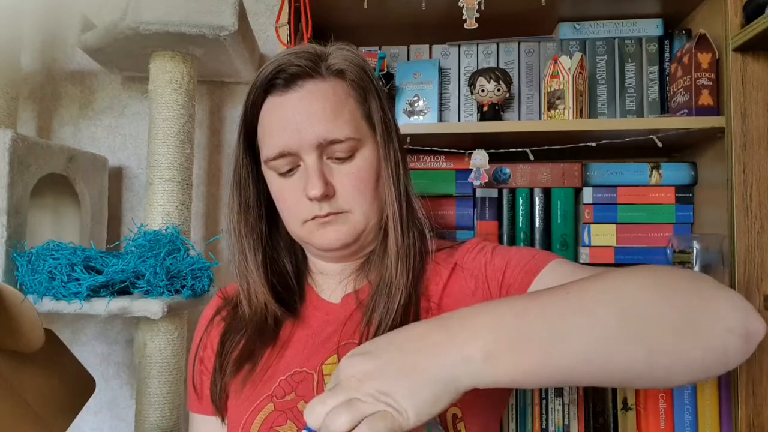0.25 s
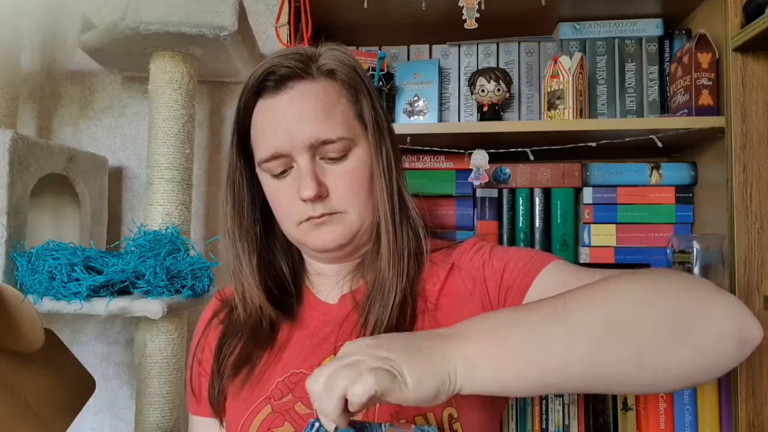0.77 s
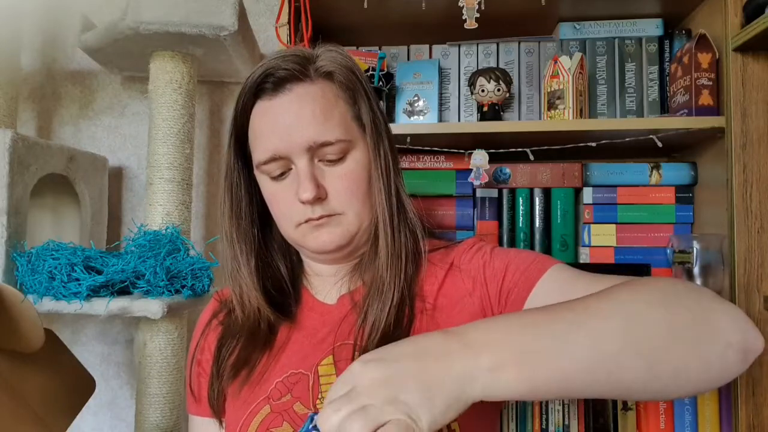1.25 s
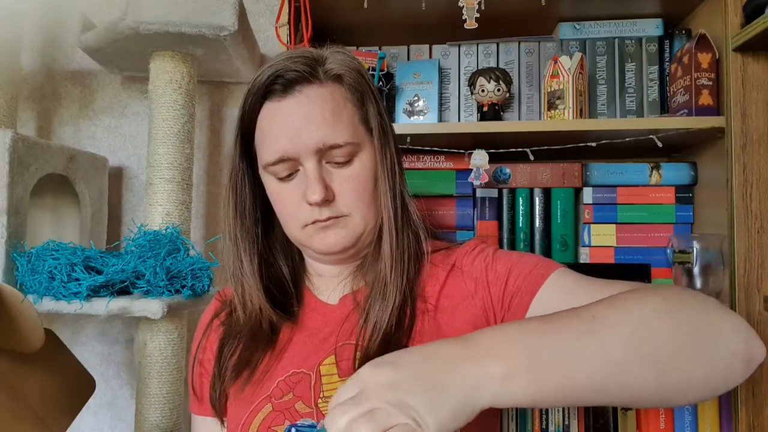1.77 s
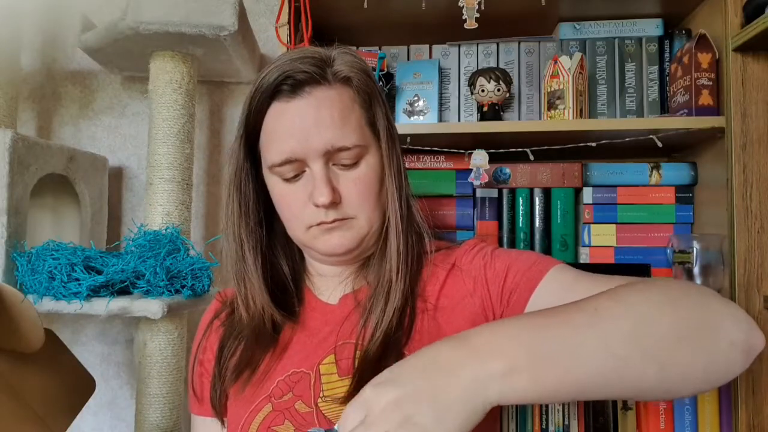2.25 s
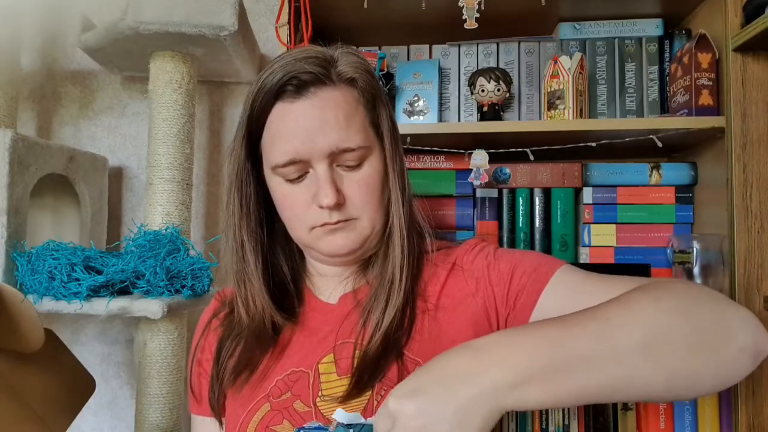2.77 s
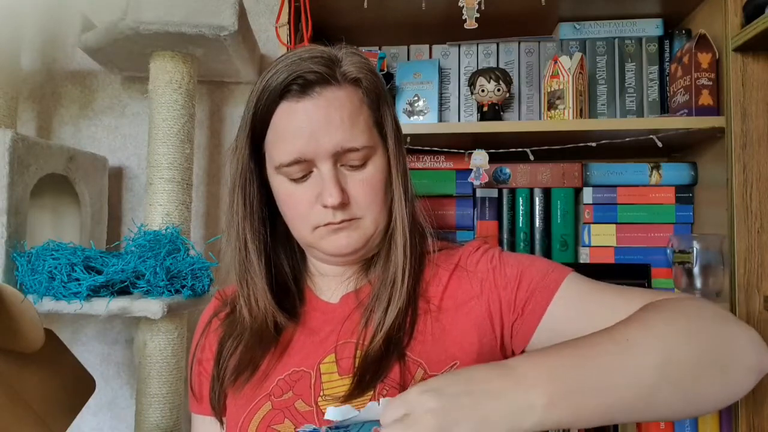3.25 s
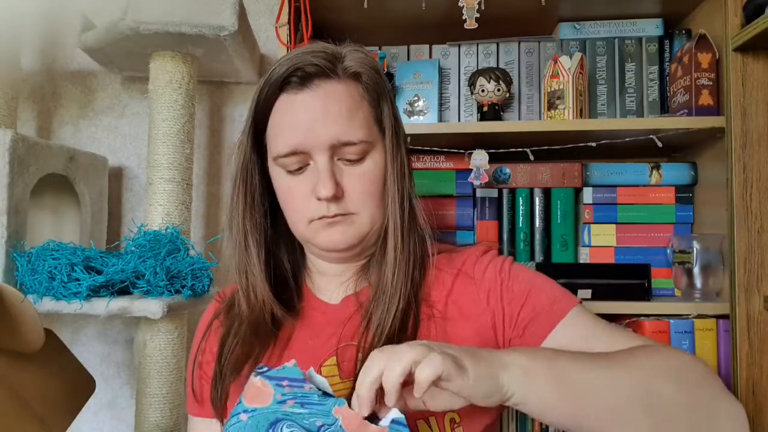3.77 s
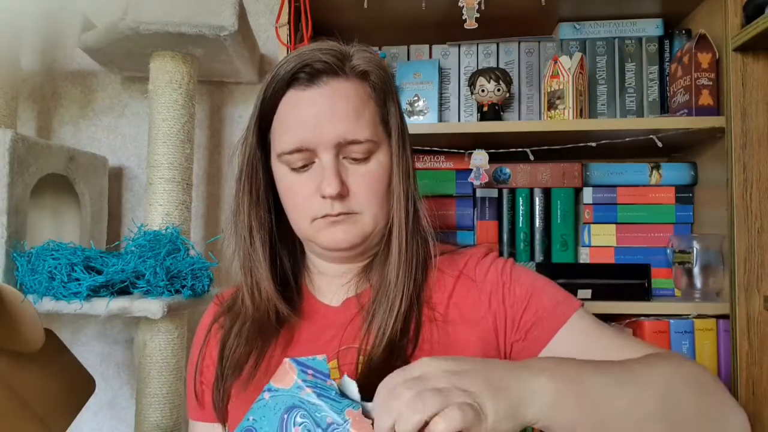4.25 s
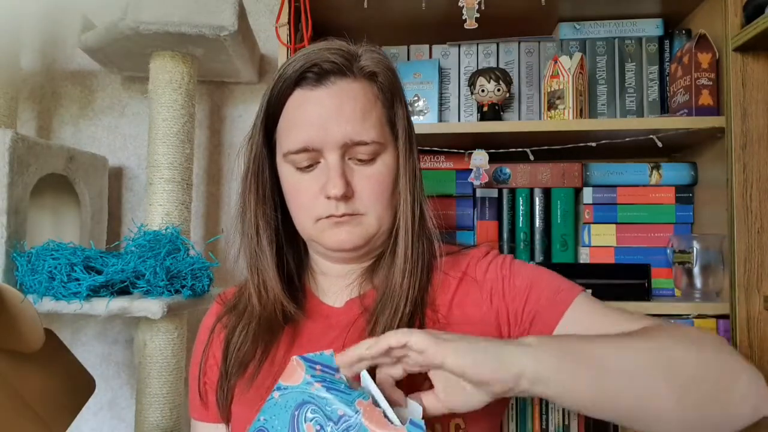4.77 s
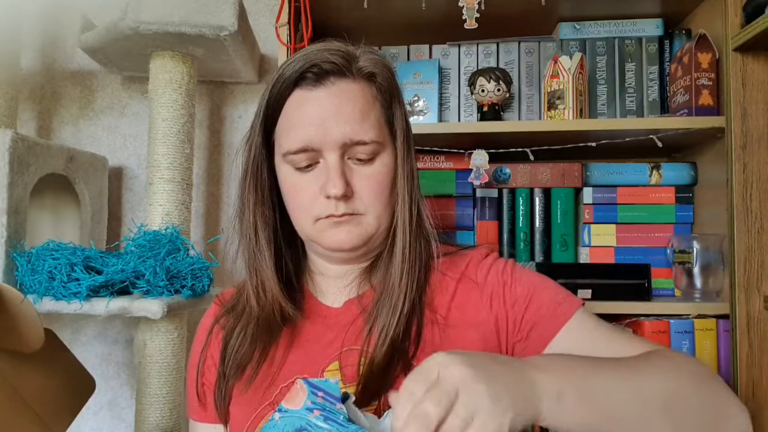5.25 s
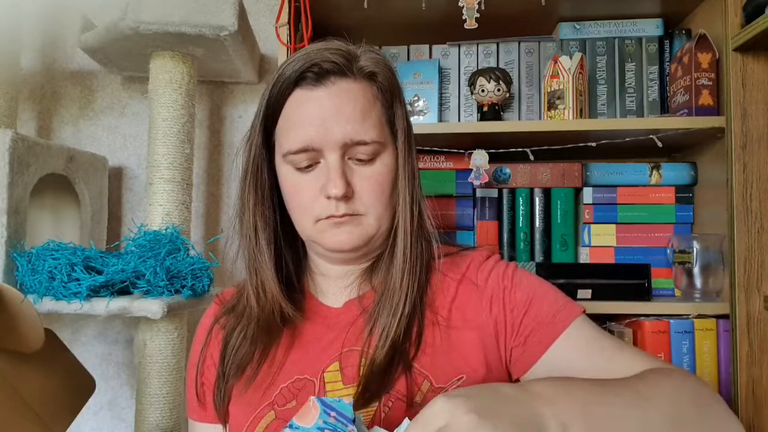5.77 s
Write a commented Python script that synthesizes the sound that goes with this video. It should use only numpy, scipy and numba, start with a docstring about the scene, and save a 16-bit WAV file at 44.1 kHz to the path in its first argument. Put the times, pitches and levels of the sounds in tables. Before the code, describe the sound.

A quiet small room with a faint, low hush, heard through a close stereo phone microphone. For the first 0.8 seconds, stiff wrapping paper only rustles very softly with tiny ticks. At about 0.86 a sharp, bright crackle breaks out, followed by snaps near 1.2 and a strong crunchy burst at 1.6, with another crinkle at 1.7. Quieter rubbing follows until about 2.45, when a rapid cluster of hard, brittle cracks forms the loudest moment. After a lull, the wrap opens around 3.0; crackles at 3.15 and 3.4 carry dull bumps from the book, less drummy now. Lighter rustling and creasing continue, with crisp snaps near 4.0 and 4.5. From 4.85 the torn paper sounds slightly hollow, with bright ticks at 4.9, low soft thuds around 5.1, a clear snap at 5.3, and crinkling through to 6.0. Echoes are very short.

```python
"""Hands tear stiff wrapping paper off a book in a small room; a faint hush (shaped noise) runs throughout.
Soft rustles open the scene: swarms of tiny grains over sliding hiss, with the parcel thudding underneath.
From 0.86 s creases snap harder, as short pitched cracks with ticks and after-cracks, loudest near 2.5 s.
At 2.98 s the wrap comes open and its drum note weakens; from 4.85 s the torn wrap rings like a pocket.
Each paper sound is followed by brief echoes of fading noise, and rustles and cracks go on to the end."""
import sys
import numpy as np
from scipy import signal
from scipy.fft import rfft, irfft
from scipy.io import wavfile
from scipy.ndimage import uniform_filter1d, map_coordinates
from numba import njit

SR = 44100
rng = np.random.default_rng(int(sys.argv[2]) if len(sys.argv) > 2 else 0)


def persist_wave(psi):
    """Save psi, clipped to +-1, as 16-bit WAV."""
    counts = np.round(np.clip(psi, -1, 1) * 32767).astype(np.int16)
    wavfile.write(sys.argv[1], SR, np.atleast_2d(counts).T)


N = 265482  # length of the scene in samples


def undb(db):
    """Turn decibels into a plain multiplier."""
    return 10 ** (np.asarray(db) / 20)


def unit(x):
    """Scale a sound to an average (RMS) strength of 1."""
    return x / np.sqrt(np.mean(x ** 2))


def colour(x, table):
    """Shape the spectrum along points of f/Hz and level/dB."""
    hz, db = np.transpose(table)
    size = x.shape[-1]
    f = np.arange(size // 2 + 1) * SR / size + 1  # the 1 avoids log(0)
    gain = undb(np.interp(np.log(f), np.log(hz), db))
    return irfft(rfft(x) * gain, size)


def band(x, lo_hz, hi_hz):
    """Keep mainly the sound between two frequencies."""
    return signal.sosfilt(signal.butter(2, [lo_hz, hi_hz], "bandpass", fs=SR, output="sos"), x)


def wander(hold):
    """Random levels held for some samples and smoothed into slopes; spread 1."""
    steps = np.repeat(rng.standard_normal(N // hold + 1), hold)[:N]
    return unit(uniform_filter1d(steps, size=hold))


@njit
def grains(n, start, step, cycles, size):
    """Each grain swells and dies within a few cycles of its own pitch; its swings balance, so it has no bass."""
    out = np.zeros(n)
    for k in range(len(start)):
        tau = cycles[k] / step[k]  # samples from start to fullest swell
        lead = 2 * np.arctan(2 * np.pi * cycles[k])  # the phase that balances the swings
        for i in range(min(int(8 * tau), n - start[k])):
            swell = np.e * i / tau * np.exp(-i / tau)
            out[start[k] + i] += size[k] * swell * np.sin(2 * np.pi * step[k] * i - lead)
    return out


def play(s, hz, cycles, size):
    """Place grains at given seconds and pitches, kept within the scene and 50-17000 Hz."""
    start = (np.clip(s, 0, N / SR) * SR).astype(np.int64)
    return grains(N, start, np.clip(hz, 50, 17000) / SR, cycles + 0 * hz, size)


def swarm(count, lo_hz, hi_hz, spread_db, cycles):
    """Grains at random moments and pitches; a few are far bigger than the rest."""
    when, pitch, rarity, sign = rng.random((count, 4)).T
    hz = lo_hz * (hi_hz / lo_hz) ** pitch
    size = undb(-spread_db * np.log(1 - .999 * rarity)) * np.sign(sign - .5) * np.sqrt(hz / lo_hz)
    return unit(play(when * N / SR, hz, cycles, size))


# Colour of the quiet room: (f/Hz, level/dB), relative
HUSH_COLOUR = [(20, -23), (50, 0.5), (200, -16.5), (1100, -24.5), (5000, -32), (15000, -26)]
HUSH_DB = -75


def hush():
    """Bass-heavy room noise, partly shared by the phone's two sound ports and partly different at each."""
    mid, side = colour(rng.standard_normal((2, N)), HUSH_COLOUR)
    side = 0.77 * side + 0.22 * band(side, 180, 18000)
    return undb(HUSH_DB) * unit(np.array([mid + side, mid - side]))


# Echoes by band: (centre f/Hz, t/s to fade by 60 dB, relative level/dB, likeness at the two ports 0-1)
ECHO_BANDS = [(544, 0.13, -8.5, 0.48), (1450, 0.08, -4.5, 0), (3530, 0.071, -5.5, 0),
              (14000, 0.19, -11, 0.6)]


def room(dry):
    """Scattered echoes from shelves and walls: noise that dies at its own rate and differs by port in each band."""
    t = np.arange(SR // 3) / SR
    tail = 0
    for hz, t60, db, alike in ECHO_BANDS:
        mid, side = rng.standard_normal((2, len(t)))
        alike = np.clip(alike, 0, 1)
        pair = np.sqrt(1 + alike) * mid + np.sqrt(1 - alike) * side * np.array([[1], [-1]])
        # silent for 1.1 ms, then rising to full over the next 1.1 ms
        fade = np.exp(-np.log(1000) * t / t60) * np.clip(t / 0.0011 - 1, 0, 1)
        echo = band(pair, hz / 2, min(hz * 2, 18000)) * fade
        tail = tail + undb(db) * echo / np.sqrt(2 * np.sum(fade ** 2))
    return signal.fftconvolve(dry[None], tail, axes=1)[:, :N]


# Dull notes of the book in its sheet, the wrap's drum first: (f/Hz, relative level/dB, t/s to fade by 60 dB)
PARCEL_NOTES = [(286.7, 6, 0.069), (433, 10.5, 0.018), (150, -10.5, 0.047), (684, 4, 0.011)]
OPENS_S, OPENING_S, OPEN_DB = 2.98, 0.17, -11  # the wrap comes open and its drum weakens


def parcel(push):
    """The book in its sheet rings dully when pushed; the drum of the closed wrap weakens as it opens."""
    t = np.arange(4096) / SR
    rings = np.array([undb(db) * np.sin(2 * np.pi * hz * t) * np.exp(-np.log(1000) * t / t60)
                      for hz, db, t60 in PARCEL_NOTES])
    rings = rings / np.abs(rings.sum(axis=0)).max()
    closed = undb(OPEN_DB * np.clip((np.arange(N) / SR - OPENS_S) / OPENING_S, 0, 1))
    drum = signal.fftconvolve(closed * push, rings[0])
    book = signal.fftconvolve(push, rings[1:].sum(axis=0))
    return (drum + book)[:N]


# Pulls and rubs of the hands on the sheet, all levels relative:
# (loudest at t/s, level/dB, build-up t/s, dying t/s, treble share level/dB, thud share level/dB)
HAND_PULLS = [(0.255, -65, .01, 0.3, 10, -39), (0.438, -54, 0.21, 0.16, -6.5, -10),
              (0.564, -57, 0.052, 0.066, -1, -19), (0.841, -47, 0.0094, 0.12, 5, -10),
              (0.863, -32.5, 0.02, 0.061, -4, -16), (1.064, -51.5, 0.048, 0.13, 1.5, -9),
              (1.186, -45, 0.11, 0.077, -0.5, -28), (1.246, -32.5, 0.0096, 0.044, -10.5, -28),
              (1.411, -54, 0.31, 0.19, -0.5, -13), (1.575, -25.5, 0.021, 0.044, 1, -16.5),
              (1.636, -38, 0.095, 0.051, -3.5, -7), (1.737, -34, 0.11, 0.026, -13, -16),
              (1.832, -53.5, 0.25, 0.036, -9, -42), (1.914, -40.5, 0.014, 0.046, -10, -14.5),
              (2.108, -52, 0.086, 0.13, 1, -9), (2.335, -50.5, 0.066, 0.11, 6.5, -39.5),
              (2.447, -35.5, 0.023, 0.26, 1.5, -13.5), (2.515, -33, 0.085, 0.059, -1, -17.5),
              (2.811, -50.5, 0.14, 0.15, 6, -9.5), (2.9, -58, 0.12, 0.1, 2, 3),
              (3.037, -48, 0.092, 0.39, -4, -19.5), (3.155, -31.5, 0.014, 0.063, -1, -4),
              (3.377, -40, 0.0092, 0.076, 4, -2), (3.422, -33, 0.11, 0.048, -2, -17.5),
              (3.62, -53.5, 0.16, 0.38, 0.5, -13.5), (3.775, -49.5, 0.017, 1, -6.5, -6),
              (3.988, -35, 0.047, 0.067, -11.5, -19), (4.111, -54, 0.023, 0.13, -1.5, -55),
              (4.27, -52, 0.12, 0.86, -5.5, -21), (4.382, -50.5, 0.26, 0.023, 0, -8),
              (4.451, -34.5, 0.003, 0.039, -10, -13), (4.493, -42, 0.017, 0.064, 2.5, 1),
              (4.682, -47.5, 0.21, 0.14, 0.5, -10), (4.835, -46.5, 0.073, 0.1, -2.5, -5.5),
              (4.924, -43, 0.012, 0.17, 1.5, -36), (5.028, -46, 0.18, 0.3, -4.5, -3.5),
              (5.112, -49, 0.012, 0.046, -17, 12.5), (5.15, -50.5, .015, 0.031, -16, 17.5),
              (5.22, -56, 0.0087, 0.23, 2.5, 3), (5.298, -41, 0.043, 0.12, -3.5, -7),
              (5.547, -50.5, 0.24, 0.22, -9.5, -14.5), (5.65, -46.5, 0.023, 0.079, -2, -14),
              (5.845, -49.5, 0.24, 0.081, -5, -6), (5.859, -41, 0.005, 0.19, -1.5, -4.5),
              (5.986, -43, 0.05, 0.15, -20, 3)]
# The sheet merely held: (level/dB, treble share level/dB, thud share level/dB), relative
HELD_SHEET = (-82, 10.5, -16)
SWELL_DB = 20  # a pull climbs this much in its build-up time and drops as much in its dying time


def effort():
    """Each pull builds up and dies away evenly in dB; overlapping pulls add power, and the louder sets the colour."""
    s, db, rise, fall, treble_db, thud_db = np.array(HAND_PULLS).T[:, :, None]
    held_db, held_treble_db, held_thud_db = HELD_SHEET
    t = np.arange(0, N + 16, 16) / SR  # every 16th sample is enough
    # neither slope is quicker than 3 ms
    slope = np.where(t < s, (s - t) / np.maximum(rise, .003), (t - s) / np.maximum(fall, .003))
    power, held = undb(2 * (db - SWELL_DB * slope)), undb(2 * held_db)
    total = power.sum(axis=0) + held

    def mean(column, rest):
        return ((power * column).sum(axis=0) + held * rest) / total

    controls = 10 * np.log10(total), mean(treble_db, held_treble_db), mean(thud_db, held_thud_db)
    return [np.interp(np.arange(N) / SR, t, c) for c in controls]


# Colour of the crackling, sliding fibres: (f/Hz, level/dB), relative
PAPER_COLOUR = [(410, 5), (700, -16), (1140, -15.5), (2160, -7.5), (6320, 5), (7010, 10), (13700, 4.5),
                (16000, -4)]
# the hand reaches into the torn wrap, which then rings like a pocket
POCKET_S, POCKET_HZ, POCKET_DB = 4.85, 1750, 2.5


def rustle():
    """Coarse and fine fibres crackle in uneven fits over the hiss of sliding sheets; the same pull shakes the parcel."""
    db, treble_db, thud_db = effort()
    fits_db = 2.4 * wander(int(.004 * SR)) + 1.3 * wander(int(.025 * SR))
    # a hard pull slides and crackles in equal parts; a gentle one slides up to 3 dB more
    sliding = undb(np.clip(-.3 * (db + 55), 0, 3))
    slide = sliding * rng.standard_normal(N)
    even = 1 / np.sqrt(1 + sliding ** 2)  # keeps the mix equally strong
    coarse = swarm(count=14000, lo_hz=657, hi_hz=6790, spread_db=2.0, cycles=0.85)
    coarse = colour(coarse + slide, PAPER_COLOUR) * even
    fine = swarm(count=18000, lo_hz=4550, hi_hz=14400, spread_db=2.0, cycles=0.44)
    fine = colour(fine + slide, PAPER_COLOUR) * even

    # slack, dull paper loses its middle along with its treble
    coarse = band(coarse, 674, 4820)
    low = uniform_filter1d(coarse, size=7)
    middle_db = 1.1 * treble_db + 2.13 * wander(int(0.033 * SR))
    coarse = unit(low + undb(middle_db) * (coarse - low))
    pocket = undb(POCKET_DB) * np.clip((np.arange(N) / SR - POCKET_S) / OPENING_S, 0, 1)
    coarse = coarse + pocket * band(coarse, POCKET_HZ / 1.37, POCKET_HZ * 1.19)
    fine = unit(band(fine, 5500, 22000))

    # harder pulls shake the parcel more than in step
    jolts = swarm(count=3000, lo_hz=243, hi_hz=1070, spread_db=1.5, cycles=0.37)
    shake_db = db + thud_db + 0.35 * (db + 37.5) + 1.12 * fits_db
    shake = parcel(undb(shake_db) * jolts) / np.std(parcel(jolts))
    return undb(db + fits_db + 1.0) * (coarse + undb(treble_db) * fine) + shake


# Creases that buckle: (t/s, relative level/dB, crack f/Hz, relative treble share level/dB)
CREASES = [(0.143, -46, 1040, -20), (0.252, -32.5, 5500, -24), (0.334, -34.5, 3070, -6),
           (0.387, -29.5, 1810, -6), (0.437, -34, 3800, -8), (0.856, -16.5, 6800, -5),
           (0.872, -25, 7100, -6), (0.884, -18.5, 12000, -5.5), (1.027, -33, 2000, 1.5),
           (1.065, -31, 4900, -2), (1.155, -30, 2030, -1), (1.178, -11, 9200, -22), (1.245, -21.5, 2440, 4),
           (1.318, -35, 1134, 1.5), (1.577, -17.5, 2060, -6), (1.584, -15.5, 3050, -2.5),
           (1.695, -25.5, 2140, 2), (1.723, -23, 2440, -2), (1.734, -16.5, 3250, -8.5),
           (1.915, -21.5, 4700, -20), (2.12, -28.5, 8500, -19), (2.321, -28, 7000, -1),
           (2.366, -33, 2400, -18), (2.437, -10.5, 4870, -28), (2.441, -17, 4400, 2.5),
           (2.456, -9.5, 4330, -20), (2.471, -11, 4600, -12), (2.484, -7.5, 7000, -7),
           (2.993, -21, 8570, -12), (3.027, -28.5, 3400, -7), (3.046, -25, 3830, -16),
           (3.101, -25.5, 3830, -11), (3.153, -14, 3400, 1), (3.301, -25, 4060, -13),
           (3.37, -34, 8100, -10), (3.391, -14, 4900, -6), (3.421, -18, 2200, -4.5),
           (3.658, -28.5, 2300, -49), (3.78, -22, 2590, -5), (3.946, -28, 3090, -9), (4.268, -27, 2460, -5),
           (4.297, -37.5, 880, -2.5), (4.324, -32, 2460, -1), (4.36, -21, 7600, -20), (4.391, -33, 2460, 1),
           (4.448, -36, 2160, -20), (4.463, -29.5, 1440, -12), (4.486, -26, 2020, -3),
           (4.492, -26.5, 2670, -10), (4.508, -21.5, 4330, -6.5), (4.913, -23, 12700, -23),
           (4.923, -17.5, 12300, -8), (4.937, -28, 8000, -4), (4.997, -33.5, 1760, -53),
           (5.032, -26.5, 1810, -9), (5.077, -33.5, 1540, 3), (5.107, -33.5, 1470, 1),
           (5.265, -26, 1303, -8), (5.296, -11.5, 1990, -18.5), (5.485, -32.5, 1740, -7.5),
           (5.544, -24.5, 1610, -12.5), (5.765, -39.5, 1550, -9), (5.857, -21.5, 3400, -4.5),
           (5.937, -29, 1470, 1.5), (5.978, -18, 2970, -6), (6.003, -17.5, 1300, -12)]


def snaps():
    """A crack at the pitch of the buckling facet, a bright tick, and a quick cluster of after-cracks of every size."""
    s, db, hz, treble_db = np.transpose(CREASES)
    after_cracks = rng.random((len(s), 4, 12)).T  # twelve for each crease
    tick = play(s, 9000 + 0 * s, .3, undb(db + treble_db + 5))
    # a dull, large facet rings for more cycles than a bright, small one
    crack = play(s, hz, np.clip(.4 - 0.028 * treble_db, .25, 2), undb(db - 1))
    out = crack + tick
    for when, pitch, bright, swing in after_cracks:
        later = .006 * when ** 2  # seconds; most follow at once, the late ones weaker
        size = undb(db - 1050 * later) * (2 * swing - 1)
        out = out + play(s + later, hz * 2 ** (2.4 * pitch - .8), 0.47, size * undb(-5.5))
        out = out + play(s + later, 5500 * 2 ** (1.5 * bright), 0.49, size * undb(treble_db + 7.0))
    return out


# A dip in the colour, as from a bounce off the table: (f/Hz, level/dB)
TABLE_DIP = [(800, -0.5), (1120, -3), (1400, 0.5)]
# Far port against near port, shaded by the phone's body: (f/Hz, level/dB)
FAR_SHADE = [(100, 1.5), (260, 1), (1300, 0), (4000, -2.5), (15000, -8)]
PORT_LAG_S = 4.6e-5  # the far port hears later by about this much


def scene():
    """Paper sounds reach two ports of a phone directly and by echo, over the room hush."""
    paper = colour(rustle() + snaps(), TABLE_DIP)
    # the paper sounds keep no deep bass below about 65 Hz
    paper = signal.sosfilt(signal.butter(2, 65, "highpass", fs=SR, output="sos"), paper)
    # the lag wanders, since each crackle comes from another spot on the sheet
    lag = SR * (PORT_LAG_S + 3e-5 * wander(int(0.0054 * SR)))
    far = map_coordinates(colour(paper, FAR_SHADE), [np.arange(N) - lag], order=3)
    echoes = room(paper)
    return np.array([paper + echoes[0], far + colour(echoes[1], FAR_SHADE)]) + hush()


TOP_HZ = 15350


def record(dry):
    """A steep low-pass filter removes nearly everything above TOP_HZ."""
    return signal.sosfilt(signal.ellip(8, .2, 70, TOP_HZ, fs=SR, output="sos"), dry)


dry = scene()
out = record(dry)
persist_wave(out)
```